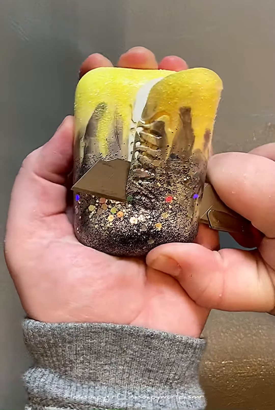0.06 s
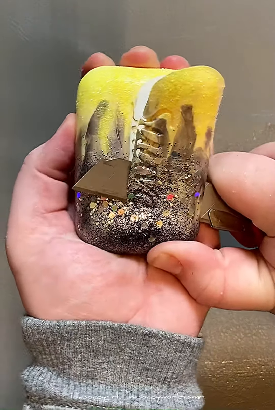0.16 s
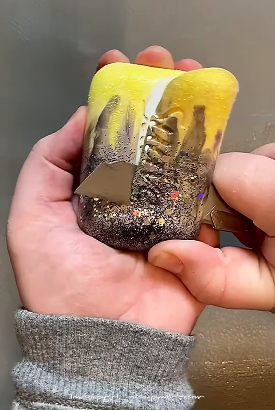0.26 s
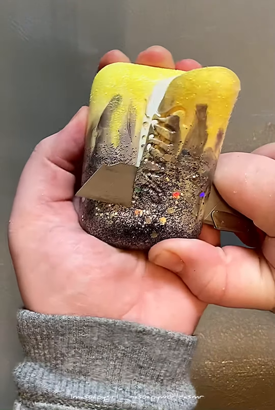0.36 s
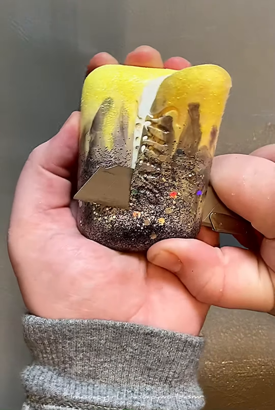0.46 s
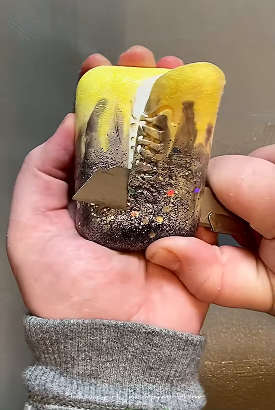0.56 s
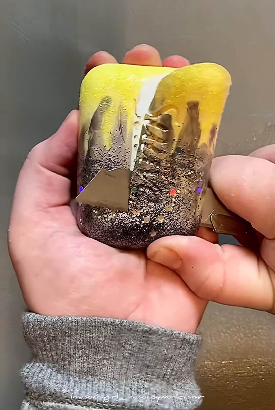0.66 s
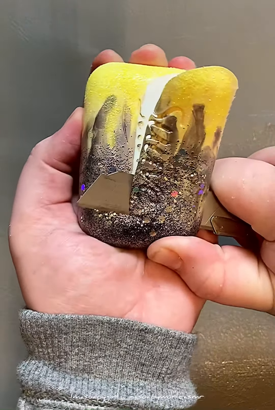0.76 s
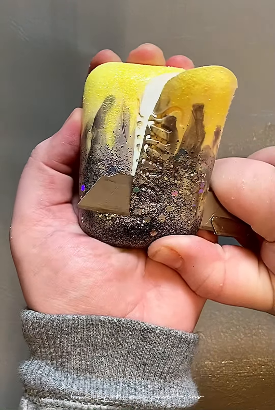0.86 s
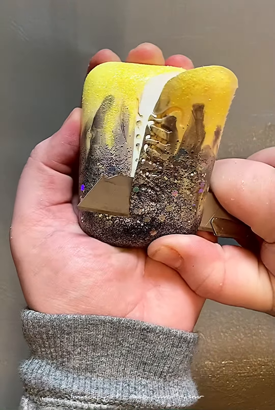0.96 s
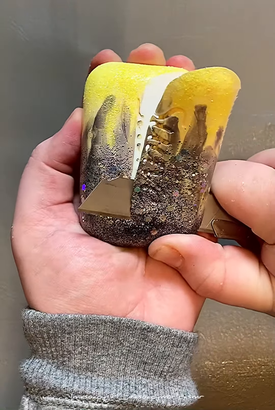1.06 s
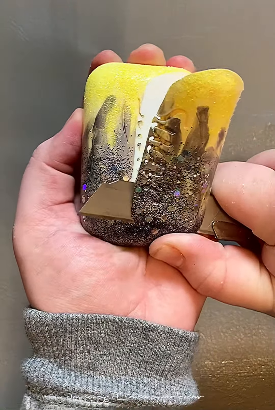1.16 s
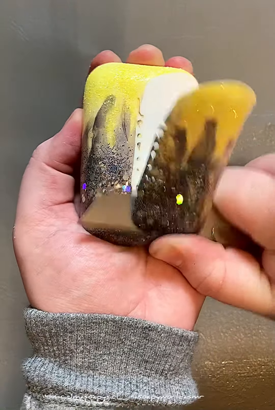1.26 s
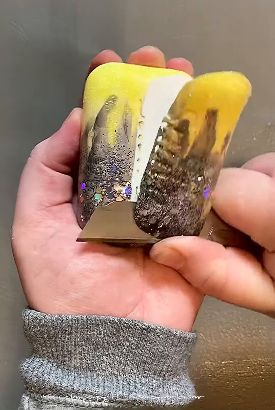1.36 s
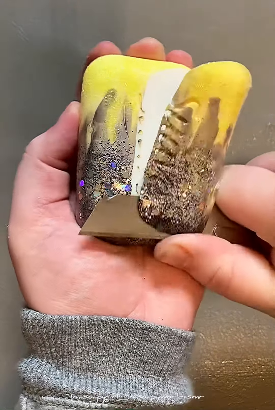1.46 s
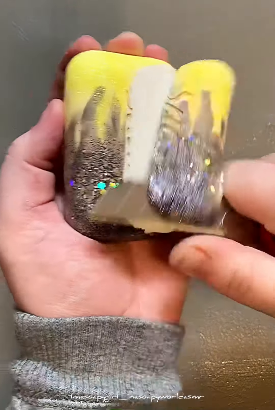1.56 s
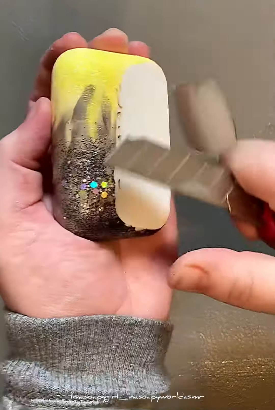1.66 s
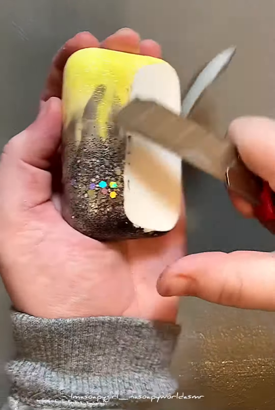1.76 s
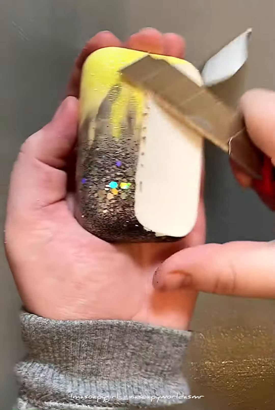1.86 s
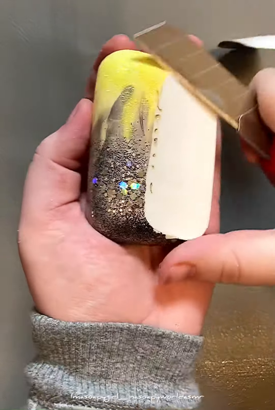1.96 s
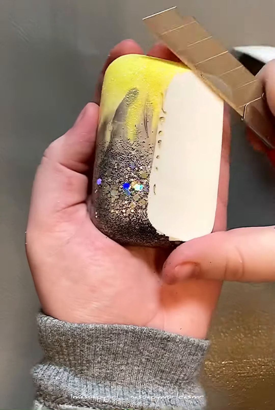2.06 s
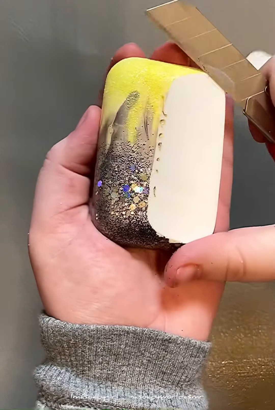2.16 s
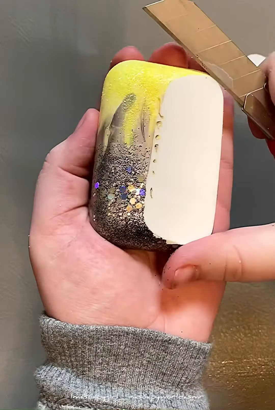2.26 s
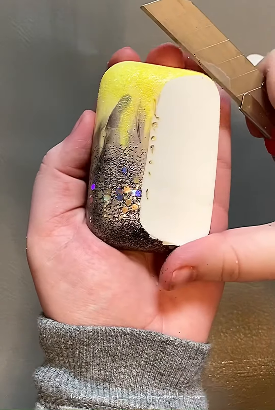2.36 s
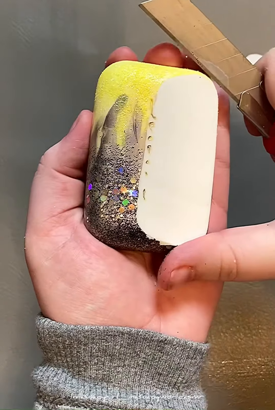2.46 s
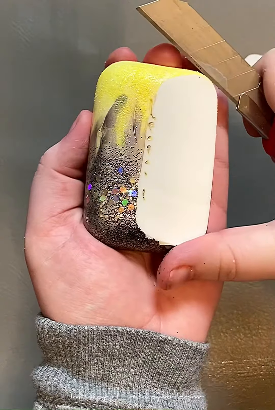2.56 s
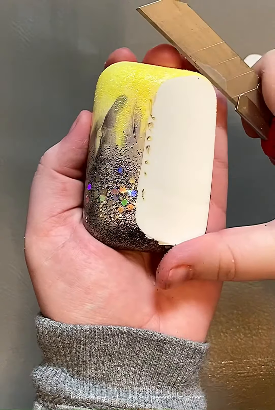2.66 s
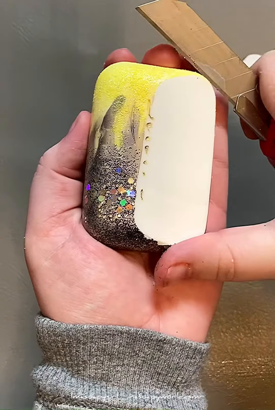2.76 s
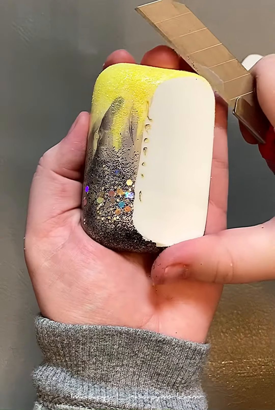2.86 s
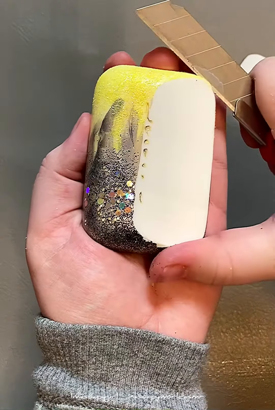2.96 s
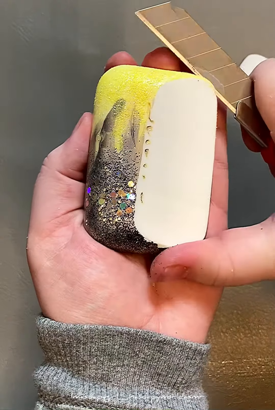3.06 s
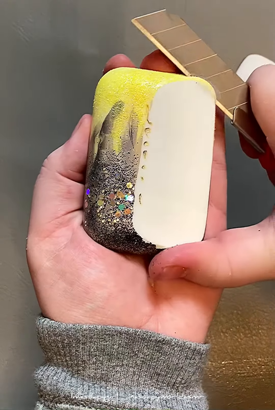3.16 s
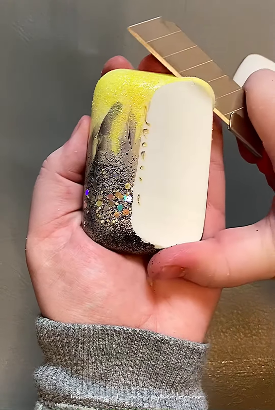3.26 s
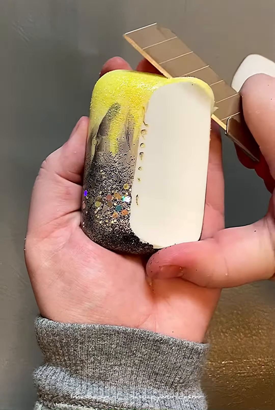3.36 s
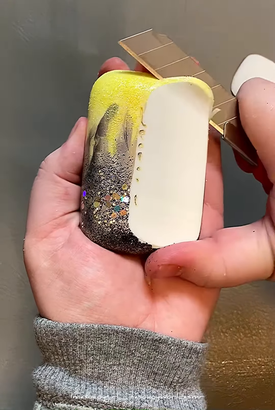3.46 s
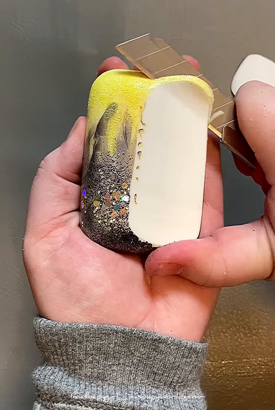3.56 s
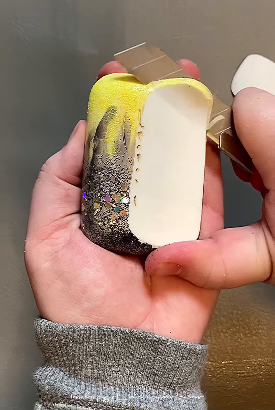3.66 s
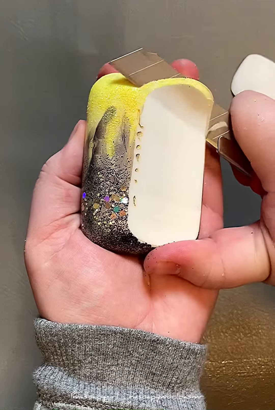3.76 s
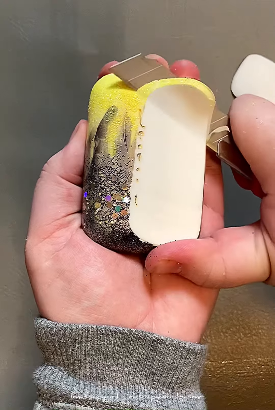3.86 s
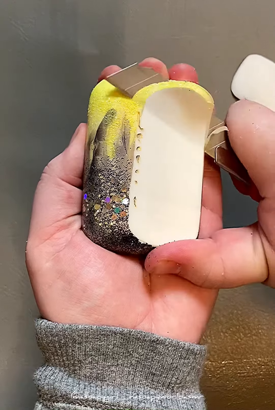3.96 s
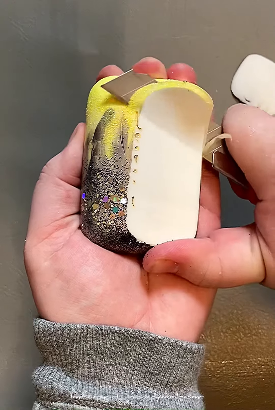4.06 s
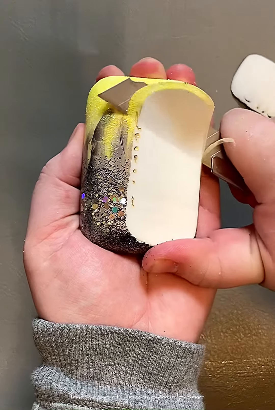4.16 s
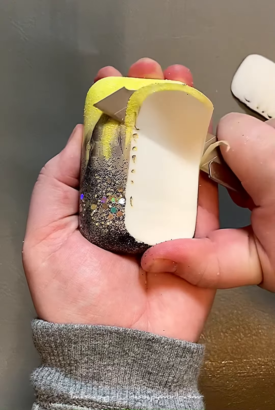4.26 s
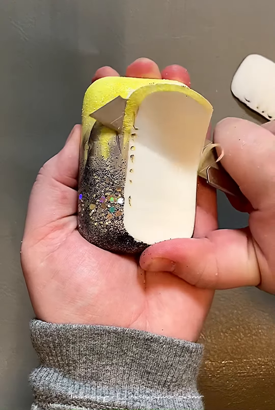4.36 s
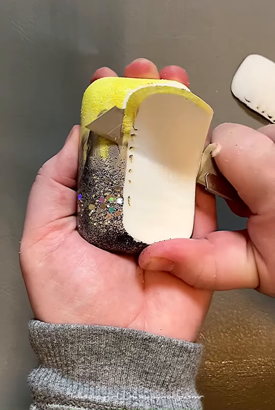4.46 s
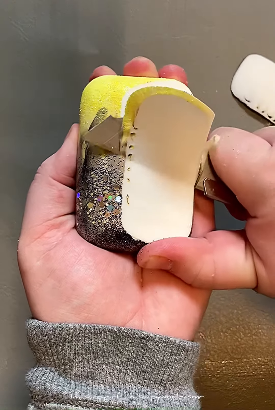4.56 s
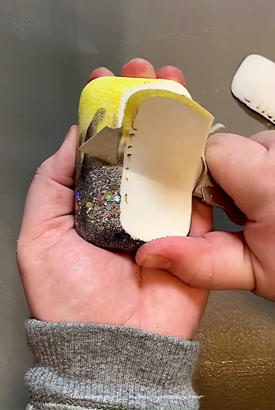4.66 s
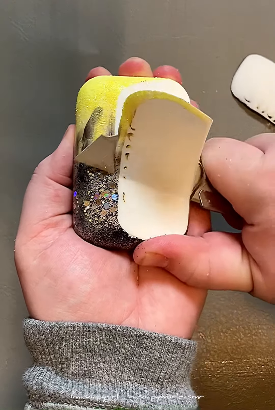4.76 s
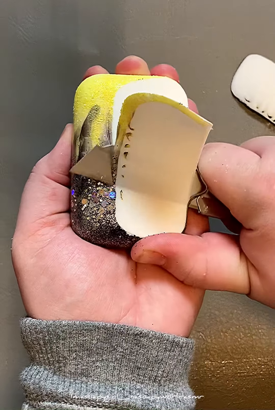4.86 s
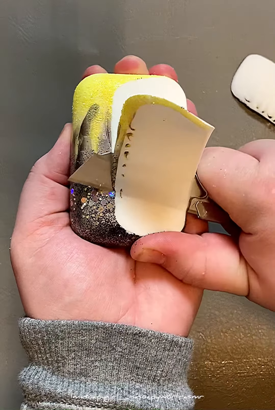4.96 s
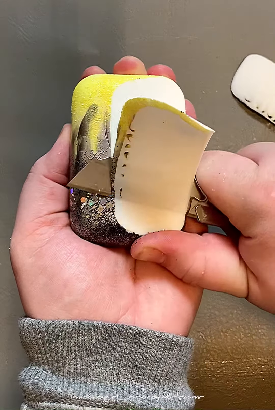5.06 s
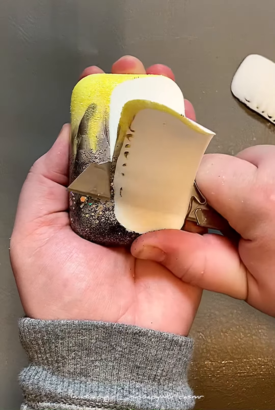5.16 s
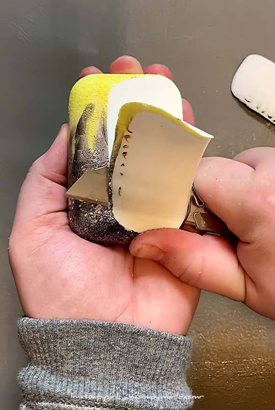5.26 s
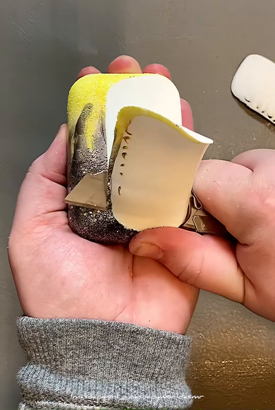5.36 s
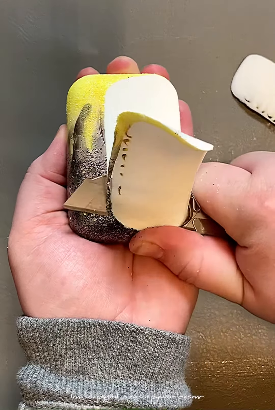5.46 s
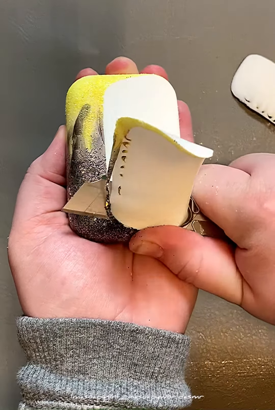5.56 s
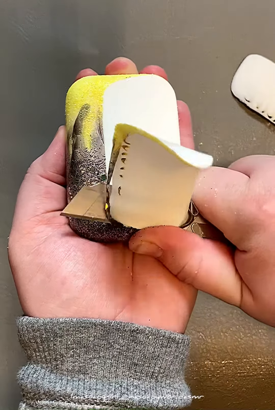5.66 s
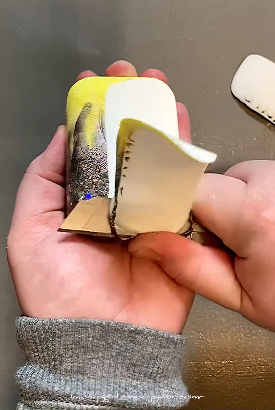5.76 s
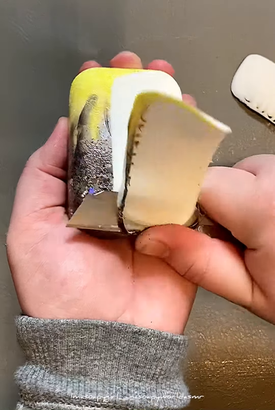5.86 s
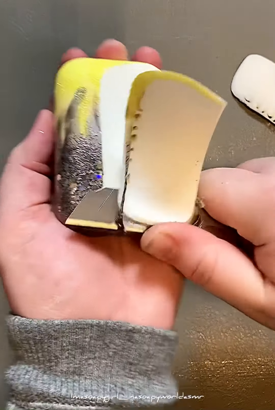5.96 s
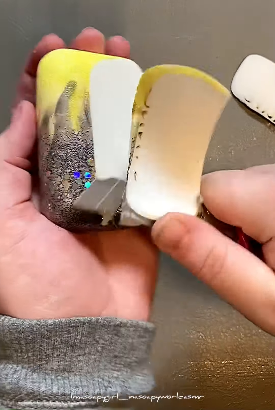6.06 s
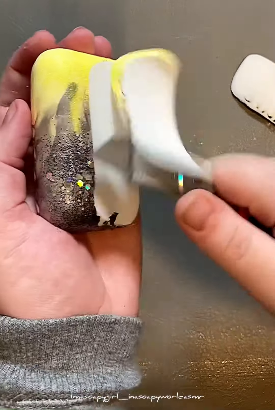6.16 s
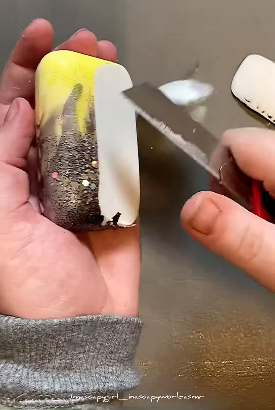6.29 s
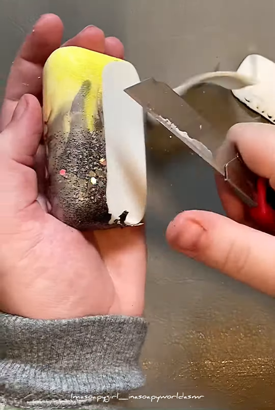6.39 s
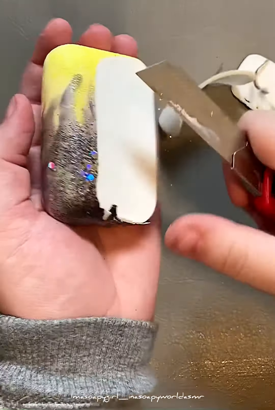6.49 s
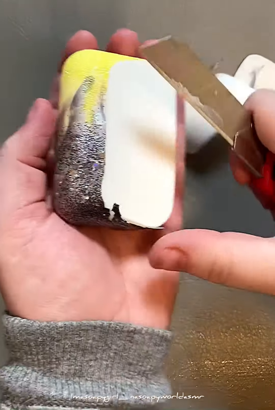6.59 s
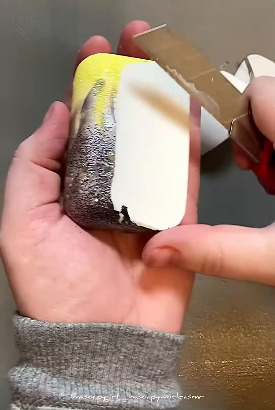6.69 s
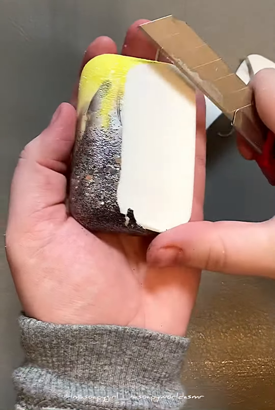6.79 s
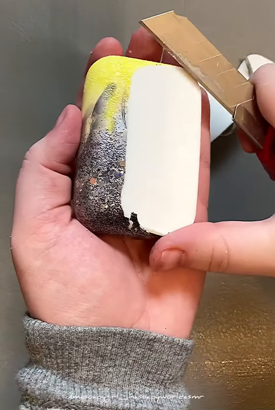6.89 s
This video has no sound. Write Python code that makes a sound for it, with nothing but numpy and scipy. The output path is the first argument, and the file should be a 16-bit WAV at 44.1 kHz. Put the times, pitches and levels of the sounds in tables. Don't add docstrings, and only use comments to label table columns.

```python
import sys
import numpy as np
from scipy import signal
from scipy.fft import rfft, irfft, next_fast_len
from scipy.io import wavfile
from scipy.ndimage import uniform_filter1d, map_coordinates

SR = 44100
rng = np.random.default_rng(int(sys.argv[2]) if len(sys.argv) > 2 else 0)


def waveform_to_disk(signal):
    frames = np.transpose(np.atleast_2d(signal))
    scaled = np.clip(frames, -1, 1) * 32767
    samples = np.round(scaled).astype(np.int16)
    wavfile.write(sys.argv[1], SR, samples)


def voltage_ratio(level):
    return 10 ** (np.asarray(level, float) / 20)


N = 305613

# time_s, level_db
MAINS = [(0.0, -58.5), (0.93, -56.5), (1.56, -55.5), (2.28, -48.5), (3.09, -65.5), (3.26, -51), (4.25, -58),
         (4.59, -53.5), (5.44, -53), (6.1, -51), (6.89, -70), (6.93, -92.5)]
MAINS_HZ = 61.14
# time_s, pitch_hz, level_db
ENGINES = [
    [(-0.05, 108.9, -50.5), (1.94, 117.8, -55), (2.2, 102.8, -93)],
    [(-0.05, 65.3, -46), (0.07, 66.0, -50), (3.0, 72.9, -63.5)],
    [(3.0, 93.1, -51.5), (3.45, 78.0, -51.5), (4.45, 65.4, -60.5), (6.34, 72.8, -47), (6.98, 65.1, -59)],
]
# time_s, level_db
TRAFFIC = [(0.0, -54), (1.23, -54), (1.6, -51), (5.79, -55.5), (6.39, -49.5), (6.93, -56.5)]
# frequency_hz, density_db
RUMBLE = [(25, -52.5), (40, -14.5), (52, -1.5), (90, -6), (140, -8.5), (190, -17.5), (260, -33.5),
          (400, -45), (600, -55.5), (900, -73)]
# frequency_hz, density_db
SHARED_HISS = [(250, -13.5), (700, -22), (1500, -23), (3500, -18.5), (6000, -16.5), (11000, -18),
               (14800, -19.5), (15800, -38.5)]
# frequency_hz, density_db
OPPOSED_HISS = [(300, 2.5), (700, -5.5), (1500, -10.5), (3000, -12.5), (5000, -33.5), (10000, -33),
                (12000, -32.5)]

# start_s, peak_db, low_hz, high_hz, high_over_low_db
SLAB_RINGS = [(0.213, -63, 1000, 3670, 11), (0.584, -56.5, 950, 3910, 38.5), (1.265, -32, 2029, 3126, -5),
              (1.341, -30, 1960, 3240, -1.5), (1.53, -41, 1117, 2530, 0.5), (1.586, -22, 1254, 2358, -3.5),
              (1.738, -20, 976, 3670, -2.5), (1.8, -34, 1197, 3160, -9), (1.941, -36, 1570, 3000, 6.5),
              (2.085, -32.5, 1700, 3260, 2), (2.119, -58.5, 1108, 3450, -7), (2.572, -34, 2066, 3440, -2),
              (4.57, -39, 1152, 2076, -3), (5.702, -32, 1028, 3480, 7.5), (5.781, -35.5, 1925, 3645, 9),
              (5.906, -49, 1240, 4070, -6), (6.028, -48.5, 1276, 2750, 0), (6.122, -43, 1587, 2970, 17),
              (6.281, -36, 1840, 3680, -3), (1.432, -52, 2065, 3000, -10), (1.946, -31.5, 1530, 3370, -11),
              (5.598, -46.5, 2760, 3880, -12), (5.721, -51.5, 2015, 3360, 7.5),
              (5.892, -53.5, 1990, 3950, 2), (5.929, -48.5, 3040, 3860, -5), (5.958, -48.5, 2720, 3950, 5),
              (6.4, -34.5, 1600, 3440, 1), (6.3, -33, 1925, 3500, 8), (6.324, -50, 2470, 4450, 18),
              (2.139, -34, 897, 3550, 14), (1.354, -46, 2060, 3260, -1), (1.625, -42, 1245, 2420, -1),
              (6.5, -38.5, 900, 3780, 1), (6.617, -50, 830, 3650, 12.5)]
SLAB_T60_S = 0.049

# start_s, crust_db, depth_db, length_ms
CRUST_BREAKS = [(0.5849, -37, -38, 0.77), (1.262, -29, -25, 4), (1.2664, -16, -29, 2.3),
                (1.2682, -14.5, -29, 1.6), (1.3226, -23.5, -6.5, 2), (1.333, -62, 30, 3),
                (1.3407, -60.5, 25, 4.5), (1.35, -73, 1, 4), (1.36, -65, 11, 2), (1.382, -63, 22.5, 3.6),
                (1.3935, -49, 0, 1.9), (1.4409, -39.5, -9, 0.91), (1.4866, -48, -11, 2.4),
                (1.5315, -49, 12.5, 3.8), (1.5807, -56.5, 13.5, 7), (1.5866, -31.5, 1.5, 5.55),
                (1.738, -44, 18, 4.8), (1.8032, -40, 14, 1.2), (1.8658, -51.5, -7.5, 3.5),
                (1.8761, -51.5, 10, 4.3), (1.8998, -58, 2, 6.1), (1.9377, -41.5, 15, 3.2),
                (1.9605, -63.5, 9, 8.2), (2.0856, -59, 22, 3.6), (2.1059, -54.5, 20.5, 5.2),
                (2.1214, -39, 15, 3.8), (2.1399, -40.5, 2, 1.9), (2.5631, -43, 4, 2.8),
                (2.571, -52.5, 20, 1.9),
                (4.5714, -43, 0.5, 1.9), (5.5986, -43.5, -7.5, 1.8), (5.6663, -43, -13, 1.3),
                (5.689, -52.5, 9, 4.3), (5.6969, -28, -26, 4), (5.7015, -14, -21, 1.7),
                (5.704, -20, -13.5, 1.9), (5.7862, -43, -1, 3.6), (5.7107, -26, -13.5, 1.6),
                (5.7808, -28.5, -5, 1.5), (5.9318, -31.5, -22, 0.92), (5.9587, -29.5, -28, 1.9),
                (6.1137, -38, -37, 5.9), (6.1191, -34, -19, 2.6), (6.1729, -44, -26, 4.2),
                (6.2826, -38, 15.5, 1.5), (6.3863, -52, 1, 5.3), (6.395, -55.5, -2, 11),
                (6.4029, -50.5, 12, 1.4), (6.501, -75, 29, 1.84), (6.616, -75, 21.5, 5.4)]
# start_s, crust_db, length_ms
FLAKES = [(3.11, -46.5, 3.2), (3.1292, -44, 3.4), (3.1372, -55, 1.9), (3.165, -44, 2.6), (3.209, -55.5, 2),
          (3.2344, -62, 0.89), (3.312, -55, 2.2), (3.3172, -52, 1.8), (3.3236, -43.5, 3),
          (3.3886, -54.5, 1.8), (3.4974, -62, 1.1), (3.5322, -65, 1.2), (3.5514, -56, 0.79),
          (3.5815, -50, 0.86), (3.686, -58, 1.1), (3.8662, -56, 2.1), (3.8775, -60, 1.9), (3.94, -53, 1.4),
          (3.9775, -46, 1.9), (4.011, -41, 1.9), (4.021, -35, 0.5), (4.03, -31, 1.9), (4.153, -50, 1.7),
          (4.165, -40.5, 1.1), (4.264, -50, 1), (1.5137, -52, 1.6), (1.5373, -54, 2), (5.685, -56, 0.81),
          (5.816, -52, 1.2), (5.923, -55, 2.2), (6.1874, -54, 1.2), (6.1986, -54, 0.65), (6.2234, -58, 2.1),
          (3.5132, -56, 0.28), (3.5425, -57, 1.1), (3.668, -56.5, 8.1), (3.8195, -47, 1.9),
          (3.893, -44, 1.6), (3.9084, -43, 1.4), (3.9729, -40, 1.3), (4.0068, -35, 1.4), (4.025, -24, 0.77),
          (4.0474, -32, 4.1), (4.0614, -33, 2.2), (4.0811, -30, 1.8), (4.1026, -42, 1.3), (4.135, -45, 2.7),
          (4.161, -42, 5.1), (4.2167, -39, 0.71), (4.2301, -32, 0.62), (4.2564, -37, 3.8), (4.2739, -44, 3)]
FLAKE_BAR_DB = -64.5
# start_s, level_db
GLINTS = [(0.5851, -31), (1.2405, -47), (3.087, -72), (3.385, -63), (3.459, -61), (3.5141, -39.5),
          (3.585, -50), (4.521, -56), (4.568, -61.5), (5.895, -52.5), (5.9587, -59)]
# centre_hz, width_hz
SOAP_MODES = [
    (11710, 4500),
    (6630, 6800),
    (3500, 1500),
    (1600, 1400),
    (14600, 5200),
]
DEPTH_SHARE = [0.026, 0.47, 1, 1, 0.3]
DEPTH_DB = [-1.5, -1, -6.5, -10.5, -13]
GLINT_DB = [-1, -13.5, -26, -57.5, 7.5]
GLINT_MS = 0.4

# start_s, force_db, drag_db
CREAKS = [
    (1.205, -72.5, -15.5),
    (1.236, -70, -11),
    (1.257, -60, -14.5),
    (5.678, -70, -10),
    (6.188, -64, -17),
    (6.205, -81, -33),
    (6.222, -83, -2),
]
# start_s, force_db, drag_db
SHOVES = [(3.112, -63, -3.5), (3.313, -65, -2.5), (3.517, -72.5, 4.5), (3.67, -76, 7.5),
          (3.82, -62.5, -5.5), (3.889, -61.5, -6.5), (3.97, -61, -17), (4.027, -51.5, -7.5),
          (4.07, -54, -5.5), (4.11, -62.5, -4.5), (4.16, -59.5, -2.5), (4.2, -56, -19.5), (4.231, -57, -3),
          (4.259, -70, 5)]
SHOVE_RISE, FIZZ_FALL, SQUEAK_FALL = 570, 174, 180
# frequency_hz, density_db
FIZZ = [(6000, -30), (8000, -5), (9300, 0), (12000, 0), (14000, -2), (16000, -8)]
# centre_hz, width_hz, level_db
SQUEAK = [(4300, 600, 3), (5700, 900, -2), (6700, 500, 0)]
# centre_hz, width_hz, level_db
GROAN = [(1250, 200, -5), (1950, 300, 0)]
GROAN_DB = -13.5
# time_s, level_db
THUMB = [
    (4.82, -79.5),
    (4.902, -68),
    (4.98, -89),
]

# start_s, peak_db, hardness_db, t60_s
DROPS = [(1.583, -53, 5.5, 0.088), (1.741, -26, 4.5, 0.041), (1.804, -32, 3.5, 0.054),
         (1.877, -39.5, 2, 0.033), (2.119, -35.5, 8, 0.082), (2.142, -28, 5.5, 0.035),
         (2.183, -39, -1.5, 0.071), (5.701, -60, 6, 0.073), (6.283, -27, 1.5, 0.059),
         (6.387, -41, 4.5, 0.049), (6.402, -30.5, 5.5, 0.045), (6.501, -47.5, 4, 0.1),
         (6.593, -51.5, 1, 0.055), (6.623, -48, 2, 0.056)]
# pitch_hz, level_db, share_of_t60
TABLE_TOP = [(175.4, -1, 1.74), (322.5, 8, 0.43), (434, -3, 0.26), (735, -3, 0.16), (970, -8, 0.11),
             (1290, -31.5, .2)]
# frequency_hz, density_db
CLATTER = [(200, -25.5), (500, -1.5), (1200, -12.5), (3500, -13.5), (6000, -26.5), (12000, -16)]

# time_s, pressure_db
SLIDES = [
    [(1.862, -75), (1.868, -42), (1.879, -43), (1.888, -53), (1.9, -42), (1.913, -42.5), (1.93, -46.5),
     (1.944, -35), (1.962, -43), (2.01, -75)],
    [(5.88, -91), (5.96, -67), (6.0, -70), (6.035, -64), (6.06, -70), (6.085, -65), (6.12, -58.5),
     (6.14, -72), (6.18, -60), (6.24, -105)],
]
# frequency_hz, density_db
RASP = [(700, -11.5), (1500, -0.5), (2200, -1.5), (3100, -7), (4500, 7.5), (6000, -16)]
# frequency_hz, density_db
GRIT = [(3500, -30), (5000, -2), (9000, 0), (12500, -3), (14000, -16), (16500, -24)]
# centre_hz, width_hz, level_db
HOLDER = [(1530, 156, -2), (1770, 82, -0.5), (2020, 100, -9), (2570, 120, 0), (3000, 75, -0.5),
          (3310, 64, 6), (3500, 80, -4), (3800, 100, -9.5)]
RASP_DB, GRIT_DB, HOLDER_DB = -12.5, -14, -6

# start_s, peak_db, tip_over_blade_db
FLICKS = [(1.8647, -47.5, -11), (1.8967, -46, 2), (1.91, -55, -14), (1.92, -72, -17), (1.9364, -25.5, -21),
          (1.9425, -46, -30), (1.962, -65, -10), (1.975, -56.5, -19.5), (6.069, -59, 3), (6.081, -56, 1),
          (6.09, -58, 5), (6.098, -56, 3), (6.1115, -41, 4), (6.118, -36, 1), (6.198, -61, 12),
          (6.211, -62, -7)]
FLICK_RISE_S = 0.0011
# pitch_hz, level_db, t60_s
BLADE = [(4670, -16, .05), (8560, -19, .035), (9970, 0, .06), (10280, -10, .04), (11300, -15, .035),
         (12300, -12, .035)]
TIP_HZ, TIP_T60_S = 13580, .045

# time_s, level_db
PALM = [
    (2.68, -94),
    (3.054, -77),
    (3.25, -86),
]
# centre_hz, width_hz, level_db
SKIN = [(400, 30, -2), (490, 25, 0), (700, 30, -5)]
# time_s, pitch_hz, level_db
HINGE = [
    (5.89, 1188, -86),
    (5.91, 1141, -75.5),
    (5.96, 1230, -88),
    (6.03, 1297, -75),
    (6.07, 1480, -105),
    (6.12, 1650, -51.5),
    (6.17, 1700, -96),
    (6.21, 1660, -74),
]

# frequency_hz, left_over_right_db
NEAR_PAN = [(300, -3), (1200, 5.5), (3000, 5), (6000, 3), (8500, 0), (12000, -.4)]
# frequency_hz, lead_rad
LEAD = [(500, 0), (2500, .3), (3600, -1), (4200, -1.6), (5200, -np.pi), (7000, -3.3), (8000, -3.8),
        (10000, -5.4), (11500, -2 * np.pi)]
# frequency_hz, t60_s
WALLS = [(200, 0.11), (2000, 0.25), (10000, 0.2)]
# frequency_hz, level_db
WALL_COLOUR = [(300, 0), (2000, 0), (5000, -1), (10000, -7), (15000, -7)]
# frequency_hz, level_db
CAPSULE = [(15000, 1), (16000, -12), (16600, -24.5), (16900, -67)]


def unit(x):
    return x / np.sqrt(np.mean(x ** 2) + 1e-20)


def along(points, hz):
    f, v = np.transpose(points)
    return np.interp(np.log(hz + 1), np.log(f + 1), v)


def curves(rows):
    s, *columns = np.transpose(rows)
    t = np.arange(N) / SR
    gate = np.clip(np.minimum(t - s[0], s[-1] - t) / .006, 0, 1)
    return [np.interp(t, s, column) for column in columns] + [gate]


def place(out, start_s, sound):
    start = round(start_s * SR)
    out[..., start:start + sound.shape[-1]] += sound


def wobble(rate):
    knots = rng.standard_normal(int(N * rate / SR) + 4)
    return map_coordinates(knots, [np.arange(N) * rate / SR])


def swells(times, peak_db, rise, fall):
    lag = np.arange(N) / SR - np.array(times)[:, None]
    return np.max(np.array(peak_db)[:, None] + np.minimum(rise * lag, -fall * lag), axis=0)


def filtered(x, response):
    m = next_fast_len(N + 8192)
    return irfft(rfft(x, m) * response(np.fft.rfftfreq(m, 1 / SR)), m)[..., :N]


def resonances(modes):
    def response(f):
        total = 0
        for k, (centre, width, db) in enumerate(modes):
            total = total + (-1) ** k * voltage_ratio(db) * 1j * f * width / (centre ** 2 - f * f + 1j * f * width)
        return total
    return response


def coloured(x, spectrum):
    return unit(filtered(x, lambda hz: voltage_ratio(along(spectrum, hz))))


def mottled(x, spectrum, patchy_db):
    z = signal.stft(x, nperseg=512)[2]
    field = uniform_filter1d(rng.standard_normal(z.shape), size=8, axis=0)
    field = uniform_filter1d(field, size=10, axis=1)
    patchy = signal.istft(z * voltage_ratio(patchy_db * unit(field)), nperseg=512)[1][:N]
    return coloured(patchy, spectrum)


def grit(spiky_db, rate):
    return rng.standard_normal(N) * voltage_ratio(spiky_db * wobble(rate))


def rubbed(modes):
    return unit(filtered(grit(spiky_db=4.5, rate=110), lambda f: resonances(modes)(f) ** 2))


def ports(x, pan):
    def both(hz):
        half = voltage_ratio(along(pan, hz) / 2) * np.exp(.5j * along(LEAD, hz))
        return np.array([half, 1 / half])
    return filtered(x, both)


def diffuse(shared, across):
    return ports(shared, [(1000, 0)]) + across * [[1], [-1]]


def tone(hz, db, unsteady_db):
    return voltage_ratio(db + 1.0 + unsteady_db * wobble(7.2)) * -np.cos(2 * np.pi * np.cumsum(hz) / SR)


def background():
    lows = tone(np.full(N, MAINS_HZ), curves(MAINS)[0] - 1.5, unsteady_db=2)
    for hz, db, gate in map(curves, ENGINES):
        firing = tone(hz, db, unsteady_db=1.5)
        octave = tone(2 * hz, db - 24, unsteady_db=3)
        lows += gate * (firing + octave)
    swell = voltage_ratio(curves(TRAFFIC)[0] + 2.5)
    rumble, across_rumble = (coloured(rng.standard_normal(N), RUMBLE) * swell for _ in range(2))
    lows = (lows + rumble) * voltage_ratio([[.8], [-.8]]) + 0.14 * across_rumble * [[1], [-1]]
    shared = mottled(rng.standard_normal(N), SHARED_HISS, patchy_db=3.0)
    across = mottled(rng.standard_normal(N), OPPOSED_HISS, patchy_db=3.0)
    return lows + diffuse(voltage_ratio(-79.0) * shared, voltage_ratio(-72.5) * across)


def slab_rings():
    out, t = np.zeros(N + SR), np.arange(SR // 8) / SR
    for s, db, low_hz, high_hz, tilt_db in SLAB_RINGS:
        drift = .14 * np.cumsum(rng.standard_normal((2, len(t))), axis=1)
        pair = np.sin(2 * np.pi * np.outer([low_hz, high_hz], t) + drift)
        pair = voltage_ratio([[-tilt_db / 2], [tilt_db / 2]]) * pair
        envelope = voltage_ratio(db - 13 - 60 * t / SLAB_T60_S) * (1 - np.exp(-t / .0015))
        place(out, s, envelope * pair.sum(axis=0))
    return out[:N]


def fracture(ms):
    t = np.arange(2048) / SR - .01
    z = rng.standard_normal(2048)
    u = np.maximum(t, 0) / (0.00045 * ms)
    lead_in = voltage_ratio(-23.5) * np.exp(-np.abs(t) / 0.0009) + voltage_ratio(-41) * np.exp(-np.abs(t) / 0.005)
    snaps = np.sign(z) * np.abs(z) ** 1.1 * (u ** .45 * np.exp(-u) + lead_in)
    return snaps * ms ** .3 / np.linalg.norm(snaps)


def cracks():
    breaks = CRUST_BREAKS
    breaks = breaks + [(s, db, FLAKE_BAR_DB - db, ms) for s, db, ms in FLAKES]
    events = [(s, db + depth_db * np.array(DEPTH_SHARE) + DEPTH_DB, ms) for s, db, depth_db, ms in breaks]
    events += [(s, db + np.array(GLINT_DB), GLINT_MS) for s, db in GLINTS]
    kicks = np.zeros((len(SOAP_MODES), N + 2048))
    for s, mode_db, ms in events:
        place(kicks, s - .01 - .00015 * ms, voltage_ratio(mode_db + 18.5)[:, None] * fracture(ms))
    out = np.zeros(N)
    for k, (centre, width) in enumerate(SOAP_MODES):
        mode = resonances([(centre, width, 0)])
        ring = filtered(kicks[k, :N], lambda f: mode(f) ** 2) * np.sqrt(4000 / width)
        out += (-1) ** k * ring
    return out


def cut():
    s, force_db, drag_db = np.transpose(SHOVES + CREAKS)
    fizz_db = swells(s, force_db, SHOVE_RISE, FIZZ_FALL)
    squeak_db = swells(s, force_db + drag_db, SHOVE_RISE, SQUEAK_FALL)
    grains = voltage_ratio(1.5 * wobble(40)) * grit(spiky_db=3.5, rate=500)
    fizz = voltage_ratio(fizz_db - 3) * mottled(grains, FIZZ, patchy_db=4.5)
    squeak = voltage_ratio(squeak_db) * rubbed(SQUEAK)
    groan = voltage_ratio(squeak_db + GROAN_DB) * rubbed(GROAN)
    thumb_db, touch = curves(THUMB)
    thumb = touch * voltage_ratio(thumb_db - 6.0) * rubbed([(3000, 1500, 0)])
    return fizz + squeak + groan + thumb


def drops():
    out, crumbs, t = np.zeros(N + SR), np.zeros(N + SR), np.arange(SR // 4) / SR
    for s, db, hard_db, t60 in DROPS:
        place(crumbs, s, voltage_ratio(db - 27 + hard_db - 60 * t / (2.8 * t60)))
        for hz, level, share in TABLE_TOP:
            u = rng.standard_normal()
            peak_db = db + 2.84 + level + hard_db * np.log2(hz / 330) + u
            strength = voltage_ratio(peak_db - 60 * t / (t60 * share))
            strength *= 1 - np.exp(-(t * hz / 0.61) ** 2)
            place(out, s, strength * np.sin(2 * np.pi * hz * (1 + 0.012 * u) * t))
    return out[:N] + crumbs[:N] * mottled(grit(spiky_db=3.5, rate=200), CLATTER, patchy_db=5)


def slide():
    pressure = sum(gate * voltage_ratio(press_db) for press_db, gate in map(curves, SLIDES))
    slips = voltage_ratio(2 * wobble(90)) * grit(spiky_db=3, rate=400)
    holder = unit(filtered(slips, lambda f: resonances(HOLDER)(f) * f / (f + 1500)))
    rasp = voltage_ratio(RASP_DB) * mottled(slips, RASP, patchy_db=7.5)
    fine = voltage_ratio(GRIT_DB) * coloured(slips, GRIT)
    return pressure * (rasp + fine + voltage_ratio(HOLDER_DB) * holder)


def flicks():
    out, t = np.zeros(N + SR), np.arange(SR // 8) / SR
    for s, db, tip_db in FLICKS:
        drift = 0.052 * np.cumsum(rng.standard_normal(len(t)))
        ring = np.zeros(len(t))
        for hz, level, t60 in BLADE + [(TIP_HZ, tip_db, TIP_T60_S)]:
            ring += voltage_ratio(level - 60 * t / t60) * np.sin(2 * np.pi * hz * t + drift)
        place(out, s, voltage_ratio(db - 3.5) * (1 - np.exp(-(t / FLICK_RISE_S) ** 2)) * ring)
    return out[:N]


def palm():
    db, gate = curves(PALM)
    creak = filtered(grit(spiky_db=5, rate=15), resonances(SKIN))
    return gate * voltage_ratio(db - 2.0) * unit(creak)


def hinge():
    hz, db, gate = curves(HINGE)
    rough = 2 * np.pi * np.cumsum(hz + 40 * wobble(120)) / SR
    return gate * voltage_ratio(db - 1 + 4 * wobble(50)) * np.sin(rough)


def walls(x):
    hz, t, z = signal.stft(rng.standard_normal((8, SR // 3)), SR, nperseg=256)
    decay = voltage_ratio(-60 * t / along(WALLS, hz)[:, None])
    tails = signal.istft(z * decay, SR, nperseg=256)[1]
    tails = tails / np.linalg.norm(tails[0])
    turn = np.arange(N) // 2600 % 4
    parts = np.repeat([x * (turn == k) for k in range(4)], 2, axis=0)
    wet = signal.fftconvolve(parts, tails, axes=1)[:, :N]
    wet = wet.reshape(4, 2, N).sum(axis=0)
    wet = filtered(wet, lambda hz: voltage_ratio(along(WALL_COLOUR, hz)))
    shared, across = np.pad(wet, ((0, 0), (180, 0)))[:, :N]
    opposed = 1.6 * filtered(across, lambda hz: hz / (hz + 400))
    return diffuse(shared, opposed) + voltage_ratio(-21) * across[::-1]


def scene():
    near = slab_rings() + cracks() + cut() + slide() + flicks() + palm() + hinge()
    thuds = drops()
    direct = ports(near, NEAR_PAN) + thuds * voltage_ratio([[.3], [-.3]])
    return direct + voltage_ratio(-14.5) * walls(near + 1.12 * thuds) + background()


def band_limit(x):
    return signal.sosfilt(signal.butter(12, 16820, fs=SR, output="sos"), x)


def record(dry):
    mix = filtered(dry, lambda hz: voltage_ratio(along(CAPSULE, hz)))
    return band_limit(mix)


dry = scene()
out = record(dry)
waveform_to_disk(out)
```